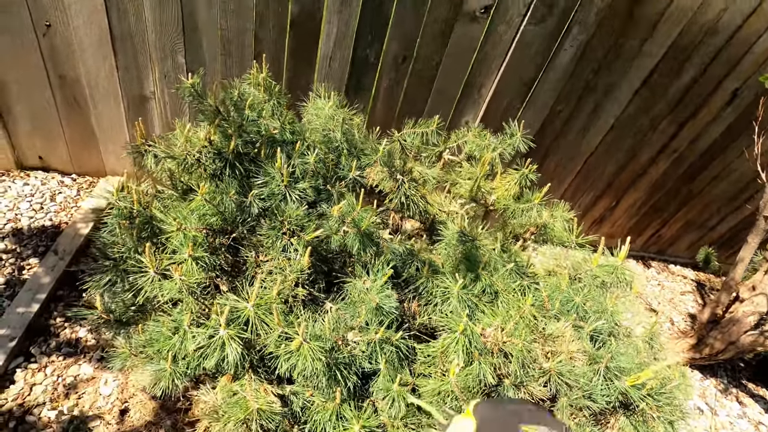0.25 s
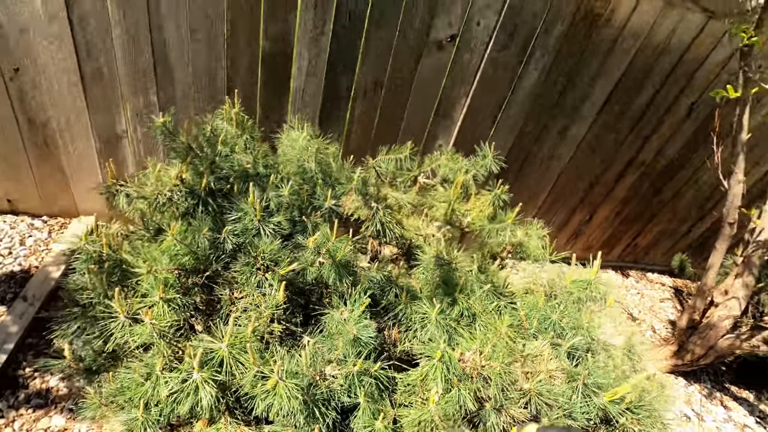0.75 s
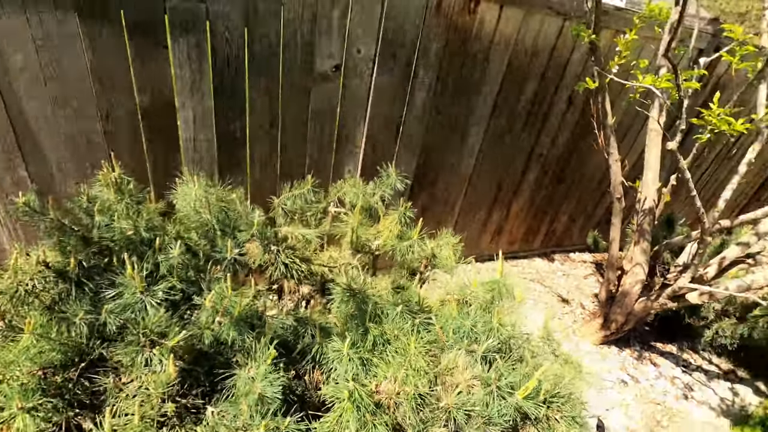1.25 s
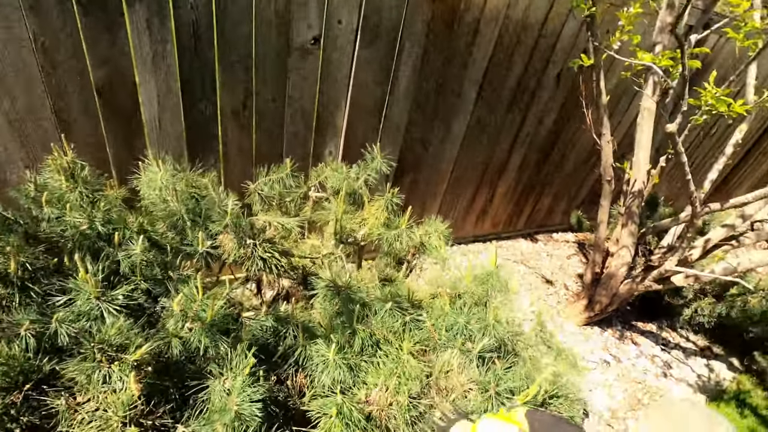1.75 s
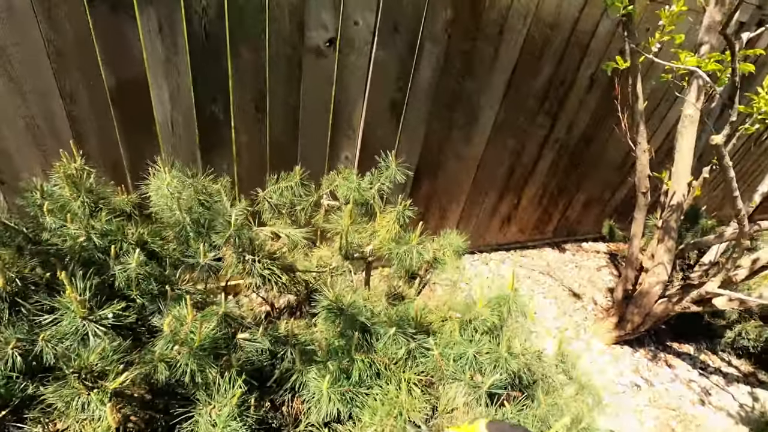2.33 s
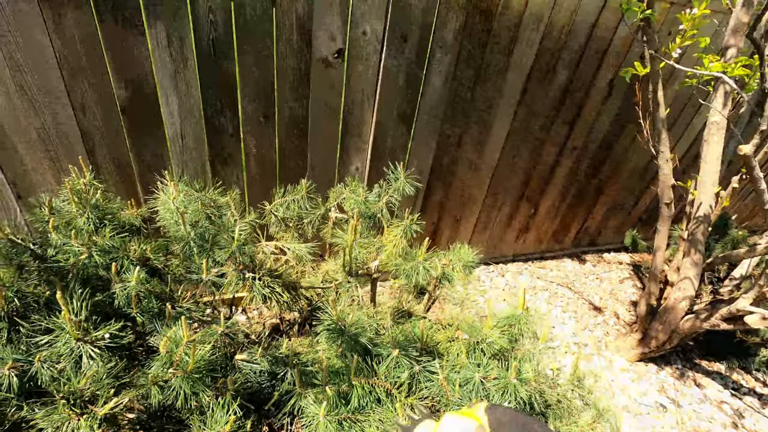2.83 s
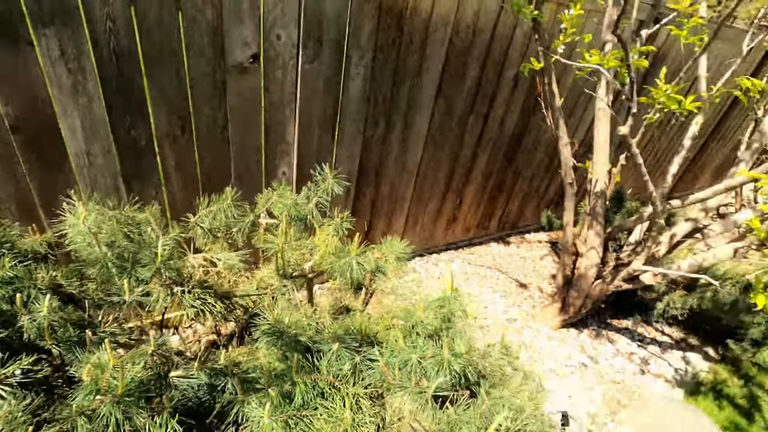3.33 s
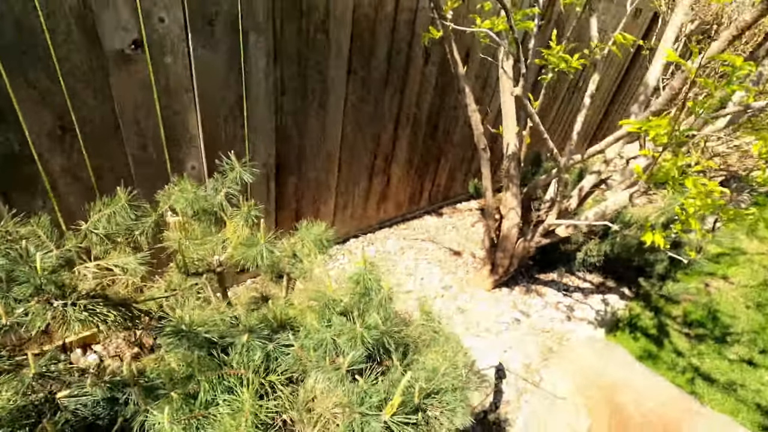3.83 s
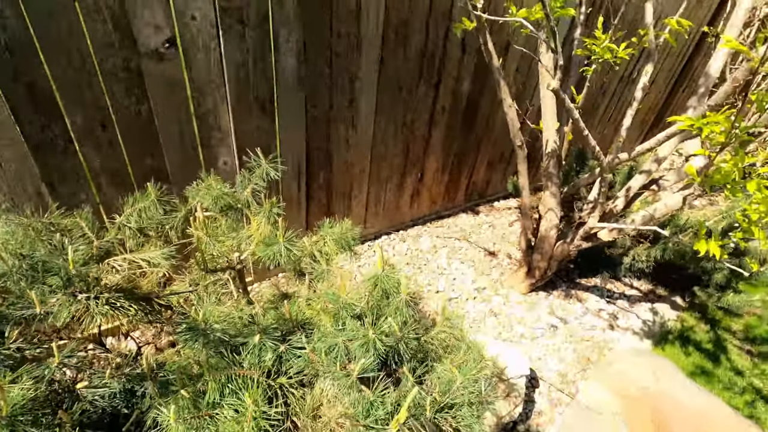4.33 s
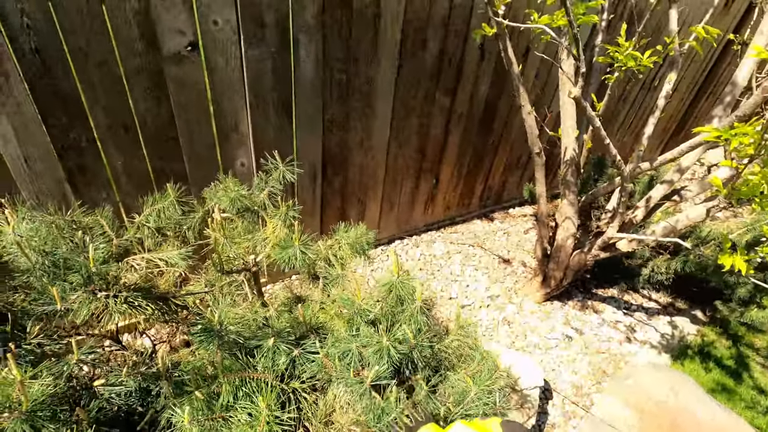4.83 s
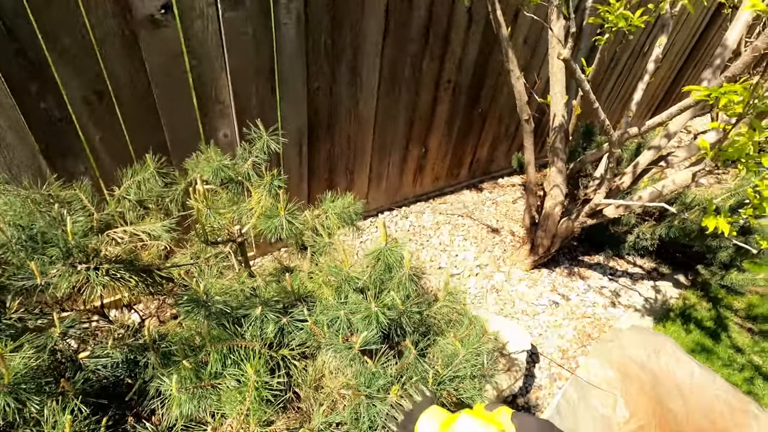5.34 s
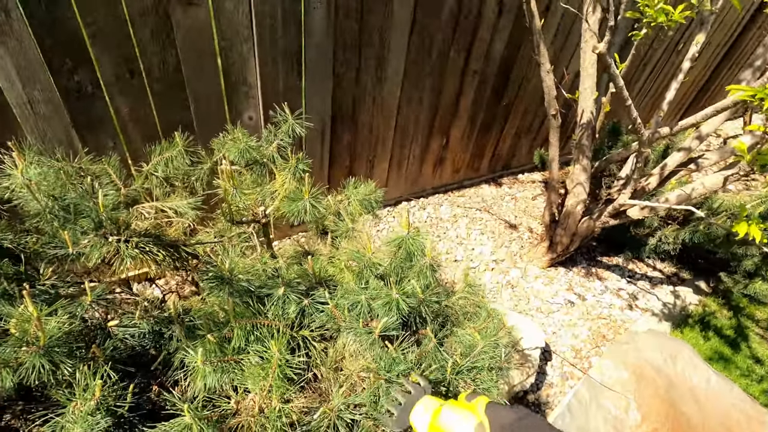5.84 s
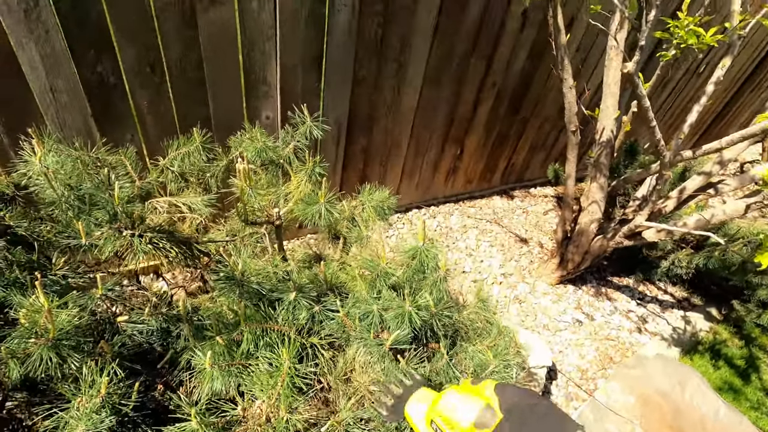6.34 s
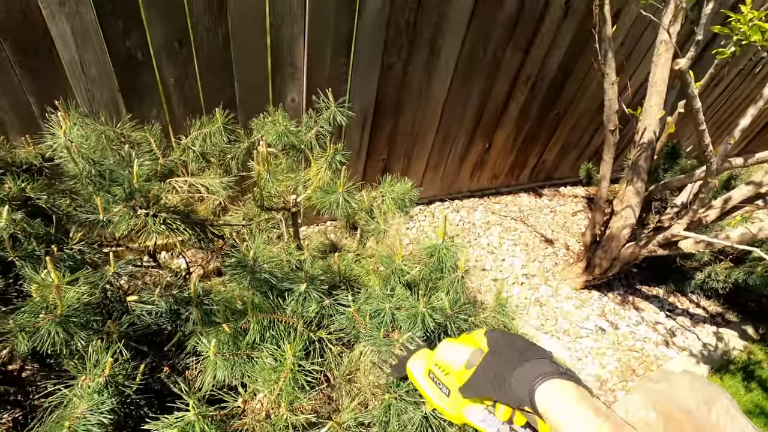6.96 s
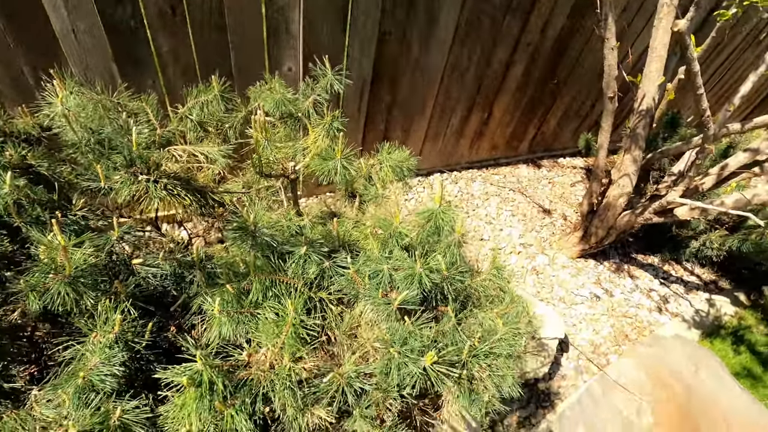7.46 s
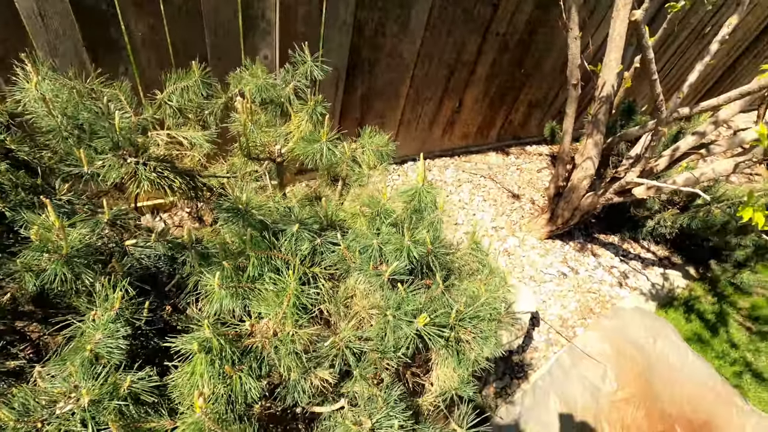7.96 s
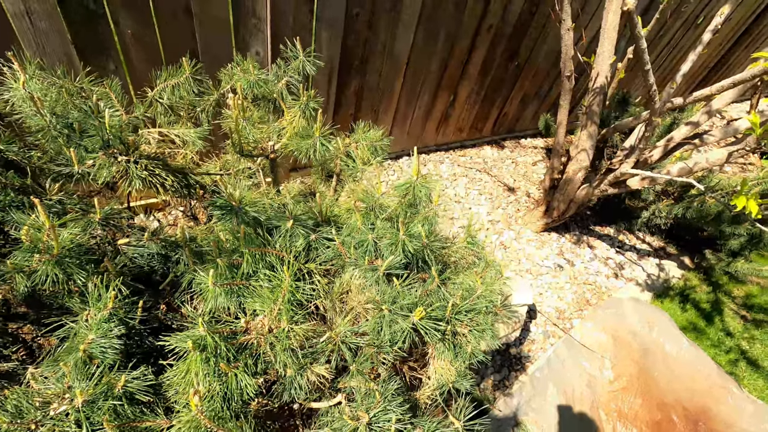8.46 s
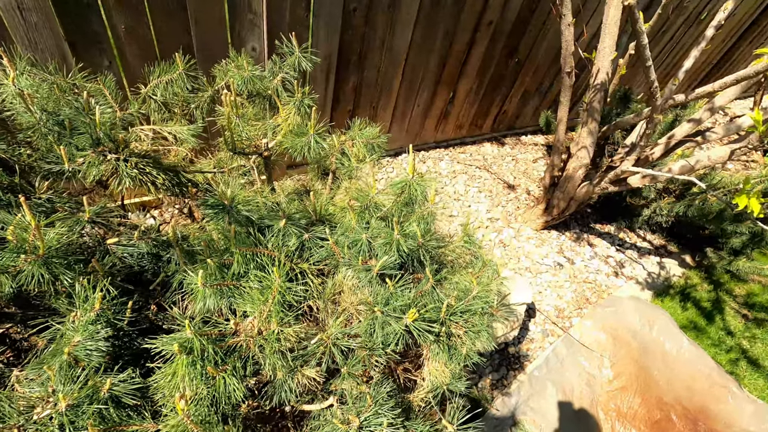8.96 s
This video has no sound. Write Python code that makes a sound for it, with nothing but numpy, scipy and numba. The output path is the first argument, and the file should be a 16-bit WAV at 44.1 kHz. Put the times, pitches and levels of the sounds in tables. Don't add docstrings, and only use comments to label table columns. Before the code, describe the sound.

A small electric hedge trimmer rattles harshly on and off in a quiet yard, its slowing teeth snipping before each short pause.

```python
import sys
import numpy as np
from scipy import signal
from scipy.fft import rfft, irfft
from scipy.io import wavfile
from scipy.ndimage import uniform_filter1d
from numba import njit

SR = 44100
rng = np.random.default_rng(int(sys.argv[2]) if len(sys.argv) > 2 else 0)


def transcribe(signal):
    frames = np.atleast_2d(signal).T
    limited = np.clip(frames, -1, 1)
    pcm = np.round(limited * 32767).astype(np.int16)
    wavfile.write(sys.argv[1], SR, pcm)


def gain_from_db(level_db):
    decades = np.asarray(level_db, float) / 20
    return 10 ** decades


N = 405719
TIME = np.arange(N) / SR

# pressed in seconds, released in seconds, crank turns in Hz,
# moment of one blade reversal in seconds
TRIGGER = [
    (-1, 0.68, 19.58, 0.342),
    (1.487, 3.13, 19.59, 2.348),
    (3.678, 5.13, 19.59, 4.416),
    (5.737, 6.4, 19.6, 6.0525),
    (6.47, 7.03, 19.66, 6.7805),
    (7.772, 9.1, 19.63, 8.483),
]
BURST_ENDS = [row[0] for row in TRIGGER[1:]] + [N / SR]


@njit
def svf(x, hz, width):
    y, b, l = x.copy(), np.zeros(2), np.zeros(2)
    for i in range(len(x)):
        g, k = np.pi * hz[i] / SR, width / hz[i]
        g = g * (1 + g * g * (1 / 3 + g * g * (2 / 15 + g * g * 17 / 315)))
        for j in range(2):
            v = (b[j] + g * (y[i] - l[j])) / (1 + g * (g + k))
            b[j] = 2 * v - b[j]
            l[j] += 2 * g * v
            y[i] = k * v
    return y


def unit(x):
    return x / np.sqrt(np.mean(x ** 2))


def curves(rows):
    s, *columns = np.transpose(rows)
    return [np.interp(TIME, s, c) for c in columns]


def walk(rate):
    hold = int(SR / rate)
    steps = np.repeat(rng.standard_normal(N // hold + 1), hold)
    return 0.686 * uniform_filter1d(uniform_filter1d(steps, hold), hold)[:N]


def coloured(points):
    hz, db = np.transpose(points)
    f = np.maximum(np.arange(N // 2 + 1) * SR / N, 1)
    shape = gain_from_db(np.interp(np.log(f), np.log(hz), db))
    return unit(irfft(rfft(rng.standard_normal(N)) * shape, N))


def coasting(since):
    coast_s = 0.66
    return np.clip(1 - np.maximum(since, 0) / coast_s, 0, 1) ** 0.8


def bumps(turn):
    # crank angle in turns, force on teeth and force on gears in dB above the reversal
    crossings = [(.09, 4.2, 3.0), (.195, 6.0, 2.6), (.3, 2.0, .8), (.36, 6.6, 2.6), (.447, 4.6, 1.8),
                 (.603, 6.2, 4.5), (.728, 8.0, 3.6), (.828, 8.0, 2.9), (.912, 2.4, .7)]
    width_turns, reversal_teeth_db, reversal_gears_db = 0.056, -5.6, -2.6
    angle, teeth, gears = np.transpose(crossings)
    away = (turn[:, None] - angle + 0.5) % 1 - 0.5
    near = np.exp(-(away / width_turns) ** 2)
    return reversal_teeth_db + near @ teeth, reversal_gears_db + near @ gears


def crank():
    # motor level in dB, extra bite of the back stroke in dB, depth of the cycle
    bursts = [(-45.5, -2, 1.1), (-43, -0.1, 0.88), (-44, 0.5, 1.05), (-45, 1, 1.15), (-43, -0.5, 0.92),
              (-43.5, 0.5, 1.06)]
    spin_up_s = 0.045
    share, turn, teeth_db, gears_db, motor_db = np.zeros((5, N))
    last_share = 0
    for (press, release, hz, reversal), (db, back_db, depth), end in zip(TRIGGER, bursts, BURST_ENDS):
        now = (TIME >= press) & (TIME < end)
        t = TIME[now]
        rise = 1 - (1 - last_share) * np.exp(-(t - press) / spin_up_s)
        share[now] = rise * coasting(t - release)
        last_share = share[now][-1]
        angle = np.cumsum(share[now]) * hz / SR
        turn[now] = angle - np.interp(reversal, t, angle)
        back = back_db * np.exp(-((turn[now] % 1 - 0.36) / 0.07) ** 2)
        on_teeth, on_gears = np.array(bumps(turn[now])) * share[now]
        teeth_db[now] = depth * on_teeth + back
        gears_db[now] = depth * on_gears
        motor_db[now] = db
    return share, turn, teeth_db, gears_db, motor_db


def loudness():
    # housing in dB, blade in dB above it, teeth in dB above it when pressed,
    # the same when released, overshoot at the start in dB
    heard = [(-22, 2, -2, -6, 3.0), (-22, 2, -3, -5, 3.5), (-22, 2, -4.5, -4, 3.5),
             (-22.5, 1.5, 0.5, -1, 3.5), (-22.5, 1.7, -0.9, -4, 1), (-21.3, 0.5, -6, -6, 3)]
    # housing loss, blade ring lift, handle lift, teeth change, all in dB
    coasts = [(-68, 2, 12, -14.5), (-51, 1.5, 8, -13), (-59, 0, 6.5, -13), (-55, 1.5, 9.5, -13),
              (-56.5, 1.5, 9.5, -10.5), (-55, 3, 9.5, -15)]
    # peak moment in seconds, peak in dB, decay in seconds
    jogs = [(1.283, -32, 0.017), (1.31, -38, 0.046), (1.34, -43, .025), (1.415, -46.5, 0.14),
            (3.635, -41, 0.011), (3.678, -30, .01), (5.679, -36.5, 0.0049), (7.47, -31.5, 0.029),
            (7.63, -49, 0.0074)]
    jog_rise_s, rest_db = 0.011, -63.5
    bite_s, kick_s, teeth_late_db, teeth_late_s = 0.017, 0.087, -16, 0.026
    gain, blade_db, teeth_db, handle_db = np.zeros((4, N))
    cold, before = 1, 0
    for trigger, burst, coast, end in zip(TRIGGER, heard, coasts, BURST_ENDS):
        press, release, *_ = trigger
        db, blade, first_db, last_db, kick_db = burst
        loss_db, ring_db, lift_db, dull_db = coast
        now = (TIME >= press) & (TIME < end)
        t = TIME[now]
        slack = 1 - coasting(t - release)
        kick = cold * kick_db * np.exp(-(t - press) / kick_s)
        full = gain_from_db(db + kick + loss_db * slack ** 3.56)
        gain[now] = before + (full - before) * np.minimum((t - press) / bite_s, 1) ** 0.67
        blade_db[now] = blade + ring_db * slack - 8.5 * slack ** 3.83
        pressed_db = np.interp(t, [max(press, 0), release], [first_db, last_db])
        late = cold * teeth_late_db * np.exp(-(t - press) / teeth_late_s)
        teeth_db[now] = pressed_db + dull_db * np.minimum(slack / 0.63, 1) + late
        handle_db[now] = -15.5 + lift_db * slack
        cold, before = slack[-1], gain[now][-1]
    for s, db, decay in jogs:
        gain += gain_from_db(db) * np.exp(-np.where(TIME < s, (s - TIME) / jog_rise_s, (TIME - s) / decay))
    return gain + gain_from_db(rest_db), blade_db, teeth_db, handle_db


def knocks(spread_db, flutter_db, apart, strike):
    uneven_db = spread_db * np.minimum(rng.exponential(size=N), 4.5)
    size = gain_from_db(uneven_db + flutter_db * np.clip(walk(260), -2.2, 2.2))
    strikes = (rng.random(N) < 140 / SR) * rng.random(N)
    dying = signal.lfilter([1], [1, -np.exp(-1 / (0.0011 * SR))], strikes)
    size = size * (1 + strike * np.minimum(dying, 1))
    common, own = rng.standard_normal((2, N))
    return unit(size * (common + apart * own * np.array([[1], [-1]])))


def worn_gears(share, turn):
    patterns = rng.standard_normal((2, 2252))
    first, second = [np.interp(turn % 1 * 2251, np.arange(2252), row) for row in patterns]
    return (first * np.cos(1.467 * TIME) + second * np.sin(1.422 * TIME)) * share ** 2


def ring(drive, modes, shift):
    out = np.zeros((2, N))
    samples = np.arange(N)
    for hz, width, db, pan_db, lag in modes:
        left, right = (svf(port, hz * shift, 2.0 * width) * gain_from_db(db) / np.sqrt(width) for port in drive)
        out[0] += gain_from_db(pan_db / 2) * np.interp(samples - lag, samples, left)
        out[1] += gain_from_db(-pan_db / 2) * right
    return out


def rattle(share, turn, on_teeth, on_gears):
    # centre in Hz, width in Hz, level in dB, left minus right in dB, left lag in samples
    handle_modes = [(224, 166, -9.5, 0.1, 1.4), (324.7, 86, -1.5, 0.1, 2.6), (381.6, 58.4, -2, 0.1, 3.2),
                    (530, 83, -2, 0.1, 0.7), (647, 173, 8.5, 0.1, 0.64)]
    housing_modes = [(1057, 140, -4, 0.1, 1.1), (1258, 164, 3, 2.5, 1.5), (1370, 366, 9, -2.4, 0.63),
                     (1600, 325, -0.5, 1.7, 7.4)]
    blade_modes = [(2394, 320, 0, 0.2, 2.36), (2727, 566, 7.5, 0.13, 1.94), (3270, 760, 0, 0.4, 2.62)]
    idler_modes = [(3020, 67, -2.5, .3, 5.2)]
    teeth_modes = [(4140, 390, 2, 0.1, 2.4), (4806, 380, 2, 0.1, 1.4), (5995, 720, 3.6, 0.042, 1.52)]
    tip_modes = [(7064, 470, 0.99, 0.35, 2.6)]
    hiss_modes = [(8870, 2400, -11, -19.5, 2.1), (9800, 1160, -12, -0.5, 1.8),
                  (11360, 1300, -15.5, 2, 3.07), (13100, 4100, -26, 19, 2.9)]
    # time in seconds, housing in Hz, blade in Hz,
    # tooth tips in dB, blade heel in dB
    wrist = [(0.0, 1290, 2820, -5.8, 0.5), (1.45, 1300, 2840, 7.5, 0), (1.5, 1310, 2840, 0.5, -2),
             (3.65, 1355, 2800, 0.5, 1.5), (3.7, 1370, 3020, 3.5, 1.1), (5.7, 1320, 2710, -1.5, 0.5),
             (5.76, 1313, 2730, -4.8, 2), (7.7, 1285, 2850, -2, 5.5), (7.8, 1504, 3023, 4.5, 7),
             (9.2, 1545, 3010, 3, 6)]
    gain, blade_db, teeth_db, handle_db = loudness()
    housing_hz, blade_hz, tips_db, heel_db = curves(wrist)
    flat_db = 1.5 + 0.17 * heel_db
    hiss_db = 0.52 + 0.48 * tips_db
    slack = 1 - share
    still = np.ones(N)
    worn = worn_gears(share, turn)
    loose_db = 1.0 * walk(30) + 3.7 * slack * walk(120)
    gears = knocks(2.82, 1.36, 0.19, 1.2)
    points = knocks(4.9, 0.77, 1.0, 2.3)
    edges = knocks(2.5, 1.4, 0.26, 2.0)

    handle = unit(ring((gears + 0.5 * worn) * gain_from_db(0.25 * on_gears + loose_db), handle_modes, still))
    shake = (gears + 0.51 * worn) * gain_from_db(1.18 * on_gears + loose_db)
    housing = unit(ring(shake, housing_modes, housing_hz / 1300))

    swing = (gears + 0.37 * edges + 0.6 * worn) * gain_from_db(1.11 * on_gears + loose_db)
    blade_shift = blade_hz / 2750
    blade = ring(swing, blade_modes[2:], blade_shift)
    blade += gain_from_db(flat_db + 0.53 * slack) * ring(swing, blade_modes[1:2], blade_shift)
    heel_drive = (edges + 0.46 * worn) * gain_from_db(0.97 * on_gears + loose_db)
    blade = unit(blade + gain_from_db(heel_db) * ring(heel_drive, blade_modes[:1], still))
    blade += slack ** 0.6 * gain_from_db(-6.5) * unit(ring(swing, idler_modes, still))

    scrape = gain_from_db(1.28 * on_teeth + loose_db)
    teeth = ring((edges + 0.15 * gears) * scrape, teeth_modes, still)
    tips = ring((edges + 1.14 * points) * scrape, tip_modes, still) * gain_from_db(tips_db - 3.2 * slack)
    hiss = ring((points + 0.52 * edges) * scrape, hiss_modes, still) * gain_from_db(hiss_db - 2.7 * slack)

    parts = housing + handle * gain_from_db(handle_db + 3.5) + blade * gain_from_db(blade_db + 1.0)
    parts += unit(teeth + tips + hiss) * gain_from_db(teeth_db + 3.5)
    return parts * gain


def motor(share, turn, motor_db):
    gear = 296.1 / 19.59
    spin = 2 * np.pi * gear * turn
    load = 1 + 0.19 * np.cos(2 * np.pi * (turn - 0.45))
    hum = (np.sin(spin) + 0.3 * np.sin(2 * spin + 1.2)) * load + 0.4 * np.sin(2 * np.pi * 17 * turn)
    mesh = sum(np.sin(2 * np.pi * order * turn + walk(6)) for order in (50, 52, 58, 64))
    return (hum + 0.75 * mesh) * share ** 4.5 * gain_from_db(motor_db + 2.5 + 1.6 * walk(12))


def shears():
    share, turn, on_teeth, on_gears, motor_db = crank()
    return rattle(share, turn, on_teeth, on_gears) + motor(share, turn, motor_db)


def yard():
    # time in seconds, firing rate in Hz, level in dB
    engine = [(0.0, 77.4, -52), (0.54, 85.4, -59), (0.8, 61.5, -62), (1.33, 73.2, -63), (2.1, 69.6, -68),
              (2.35, 66.5, -71), (2.56, 61.0, -65), (3.23, 64.5, -53), (3.94, 61.9, -53), (4.05, 67.7, -52),
              (4.82, 72.6, -49), (5.4, 71.9, -64), (5.66, 78, -55), (6.48, 83.6, -45), (7.51, 86.7, -49.5),
              (8.3, 66, -65), (8.61, 70.8, -57), (9.2, 70.7, -45)]
    # frequency in Hz, density in dB per Hz
    air_points = [(60, 1), (150, -4.5), (400, -10), (1200, -10), (2500, -14), (5000, -20), (8000, -28),
                  (12000, -50), (15500, -50)]
    hz, db = curves(engine)
    cycle = 2 * np.pi * np.cumsum(hz + 1.2 * walk(5.9)) / SR
    tones = np.sin(cycle) + 0.046 * np.sin(2 * cycle) + 0.11 * np.sin(3 * cycle) + 0.066 * np.sin(4 * cycle)
    drone = gain_from_db(db + 5.5 + 1.65 * walk(13)) * tones
    rumble = coloured([(15, -28), (40, -14), (60, -3.5), (100, -13), (200, -21.5), (400, -52)])
    rumble *= gain_from_db(-54.5 + 0.43 * (db + 56.5) + 5.9 * walk(5.1))
    air = coloured(air_points) + 0.76 * coloured(air_points) * np.array([[1], [-1]])
    air *= gain_from_db(-54.5 + 3.9 * walk(18))
    wind = np.array([coloured([(15, 12), (45, -17), (120, -28), (300, -50)]) for _ in range(2)])
    wind *= gain_from_db(-78 + 2.9 * walk(4))
    return drone + rumble + air + wind


def snips():
    # start in seconds, peak in dB (the loudest are held at -17.5 dB)
    passes = [(0.8974, -17), (0.9258, -28), (0.9662, -24), (1.0016, -25), (1.054, -27), (1.1532, -33),
              (5.3298, -12), (5.394, -23), (5.4296, -21), (5.4594, -29), (5.477, -22), (5.4929, -20),
              (5.5024, -30), (5.5942, -35), (5.6063, -30), (7.2015, -9), (7.2317, -11), (7.3236, -20),
              (7.3677, -24), (7.3801, -14), (7.3914, -22), (7.4579, -26), (7.4674, -23),
              (3.2061, -8), (3.2715, -12), (3.3268, -19), (3.3817, -19), (3.4201, -23), (3.4501, -14),
                   (3.4994, -28), (3.5633, -28), (3.5877, -26), (3.6194, -34)]
    rows = passes
    out, t = np.zeros((2, N)), np.arange(500) / SR
    band = signal.butter(2, [4500, 9500], "band", fs=SR, output="sos")
    chance = rng.standard_normal((len(rows), 3, 500))
    for (s, db), (common, *own) in zip(rows, chance):
        scrape = signal.sosfilt(band, (common + 0.62 * np.array(own)) * np.exp(-t / 0.0018))
        start = int(s * SR)
        out[:, start:start + 500] += gain_from_db(min(db, -17.5) - 0.5) * scrape / np.abs(scrape).max()
    return out


def ticks():
    # start in seconds, peak in dB, ring in Hz, crack in dB
    snaps = [(1.219, -33.0, 2500.0, -43), (1.232, -27, 2200.0, -50.0), (1.285, -16, 815, -38),
             (1.322, -22, 1500.0, -34), (1.355, -28.0, 1800.0, -34), (1.36, -30, 2980, -39),
             (1.392, -27, 5500.0, -34), (1.403, -26, 1300.0, -44), (1.461, -28, 3520, -38),
             (5.719, -28, 1345, -45), (7.573, -23, 2880, -34), (7.63, -25, 1184, -45),
             (7.642, -37.0, 3000.0, -46), (7.652, -43.5, 3020, -40.5), (7.678, -45.0, 2500.0, -39),
             (7.685, -49.0, 2500.0, -44), (7.718, -21, 1600.0, -48.0), (7.722, -29, 752, -35),
             (7.747, -35, 1900.0, -49.0), (7.762, -41, 2470, -36)]
    out, t = np.zeros((2, N)), np.arange(700) / SR
    band = signal.butter(4, [2800, 8500], "band", fs=SR, output="sos")
    cracks = signal.sosfilt(band, rng.standard_normal((len(snaps), 2, 700)))
    for (s, db, hz, crack_db), crack in zip(snaps, cracks):
        tone = gain_from_db(db) * np.sin(2 * np.pi * hz * t) * np.exp(-t / 0.00071)
        start = int(s * SR)
        out[:, start:start + 700] += tone + gain_from_db(crack_db + 10) * crack * np.exp(-t / 0.00062)
    return out


def dove():
    # start in seconds, length in seconds, pitch in Hz, level in dB
    coos = [(5.365, .05, 544, -36.5), (5.532, 0.054, 540, -37), (5.707, 0.068, 548, -36.5),
            (5.875, 0.055, 540, -42), (6.03, 0.073, 544, -41), (6.105, 0.034, 530, -36),
            (6.166, 0.086, 520, -39), (8.146, .2, 508, -39), (8.448, 0.22, 514, -45)]
    out = np.zeros(N)
    for s, length, hz, db in coos:
        edge = np.clip(np.minimum(TIME - s, s + length - TIME) / 0.008, 0, 1)
        out += gain_from_db(db + 2) * edge * np.sin(2 * np.pi * hz * TIME)
    return out * gain_from_db(1.5 * walk(25))


def scatter(tool):
    t = np.arange(3000) / SR
    echoes = rng.standard_normal((2, 3000)) * np.exp(-t / 0.0055) * (t > 0.002)
    echoes *= gain_from_db(-17) / np.sqrt(np.sum(echoes ** 2, axis=1, keepdims=True))
    return signal.fftconvolve(tool, echoes, axes=1)[:, :N]


def scene():
    tool = shears() + snips() + ticks()
    return tool + scatter(tool) + yard() + dove()


def band_limit(x):
    return signal.sosfilt(signal.butter(12, 15750, fs=SR, output="sos"), x)


def record(dry):
    rounded = np.tanh(0.79 * dry) / 0.7
    top_cut = signal.ellip(8, 0.3, 60, 15280, fs=SR, output="sos")
    return band_limit(signal.sosfilt(top_cut, rounded))


dry = scene()
out = record(dry)
transcribe(out)
```